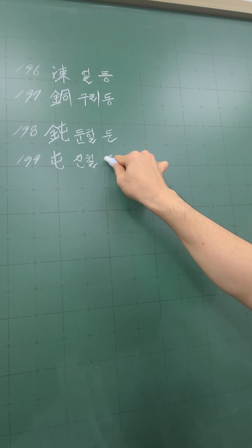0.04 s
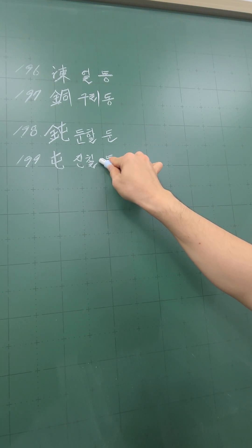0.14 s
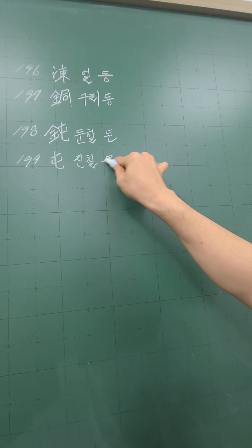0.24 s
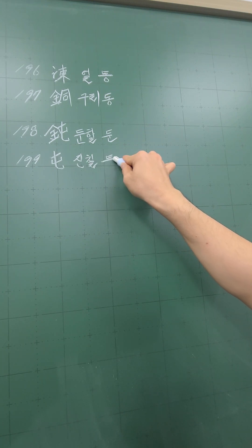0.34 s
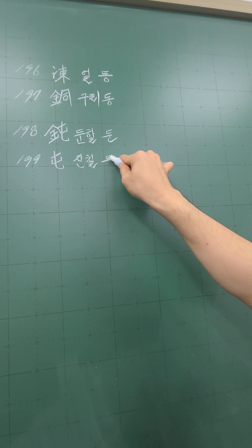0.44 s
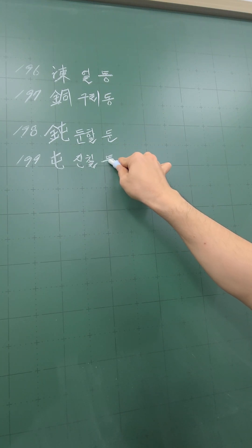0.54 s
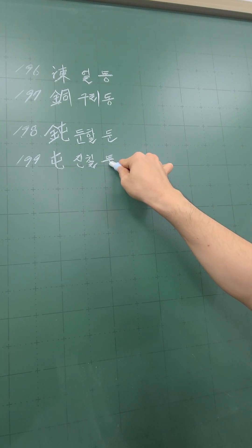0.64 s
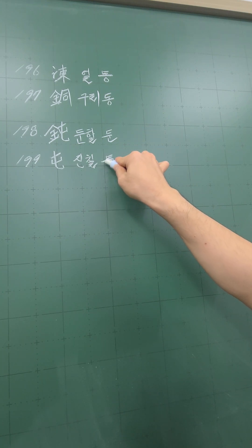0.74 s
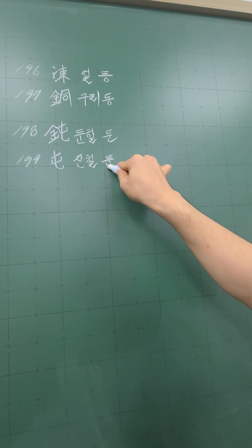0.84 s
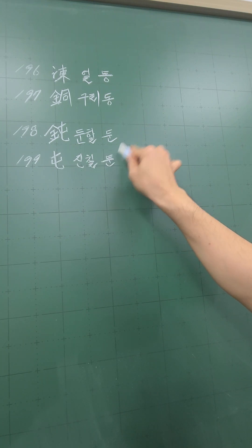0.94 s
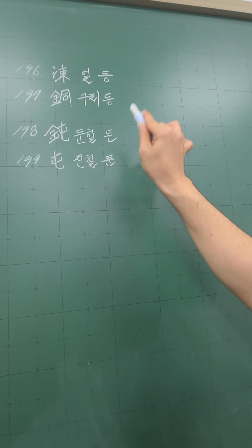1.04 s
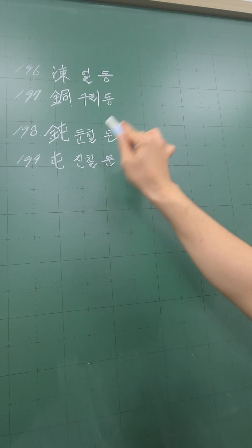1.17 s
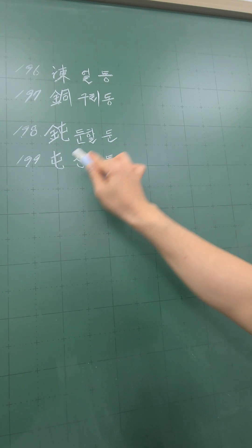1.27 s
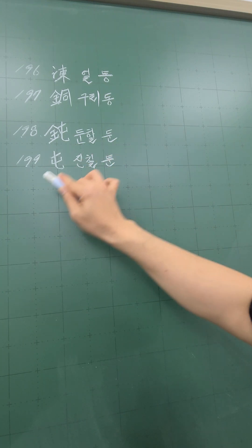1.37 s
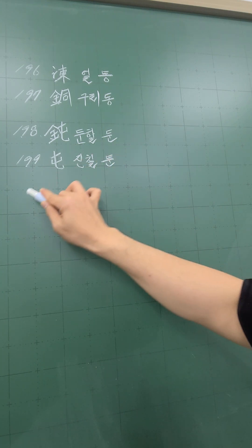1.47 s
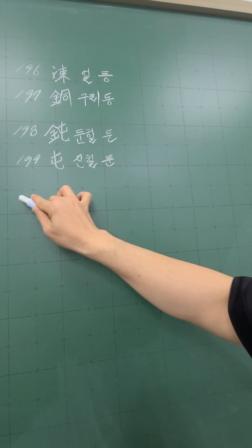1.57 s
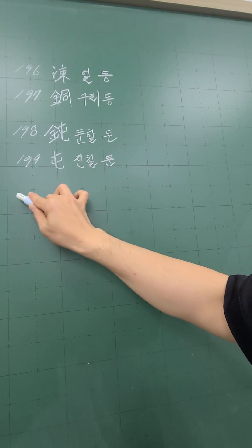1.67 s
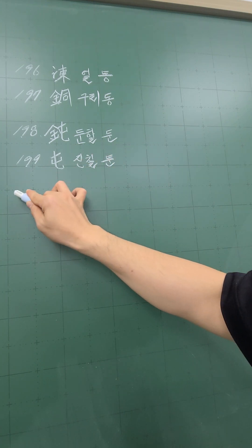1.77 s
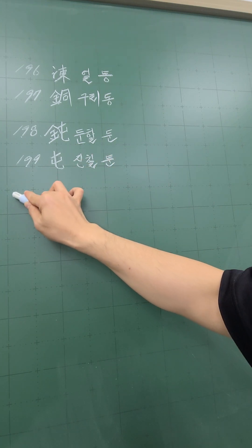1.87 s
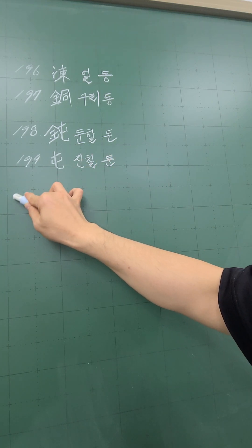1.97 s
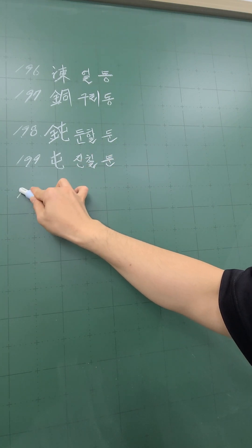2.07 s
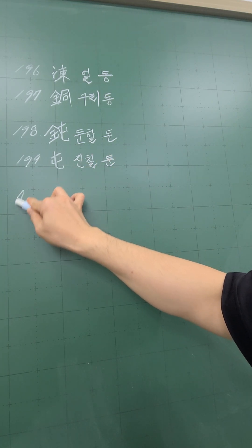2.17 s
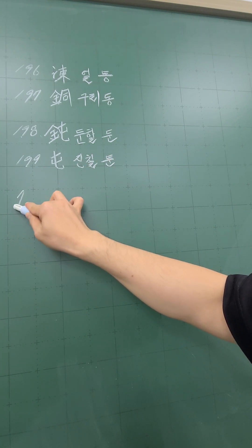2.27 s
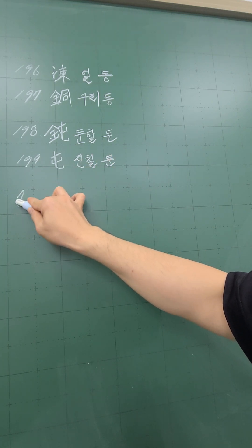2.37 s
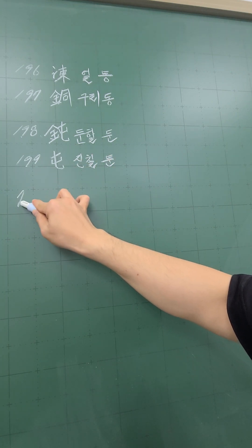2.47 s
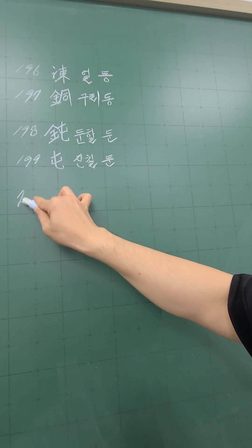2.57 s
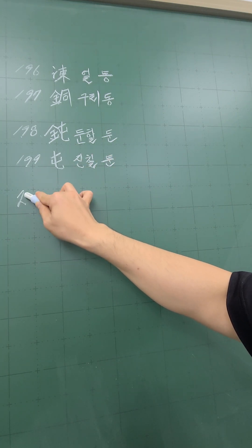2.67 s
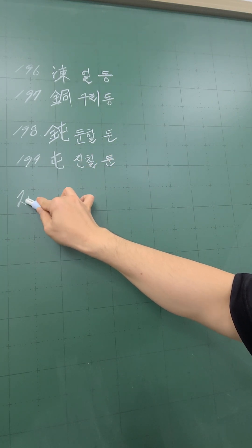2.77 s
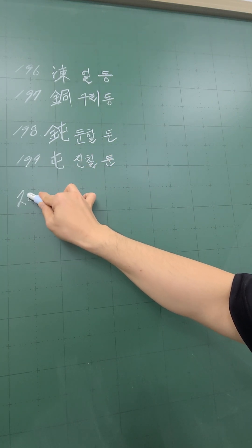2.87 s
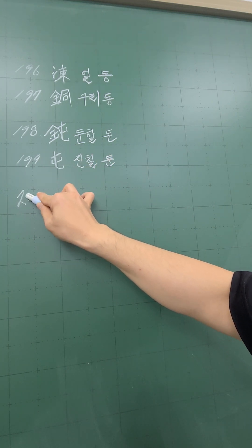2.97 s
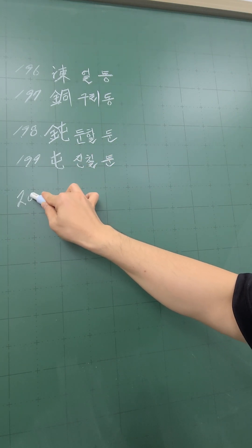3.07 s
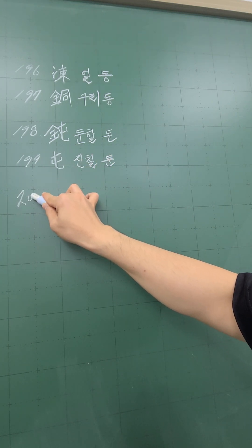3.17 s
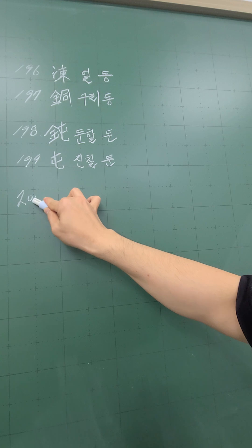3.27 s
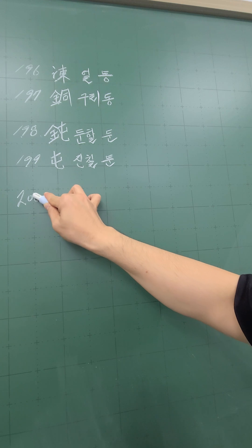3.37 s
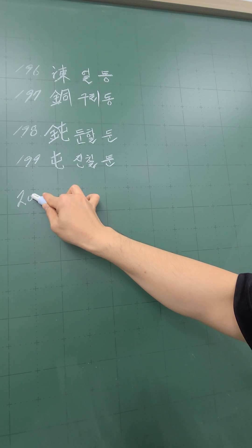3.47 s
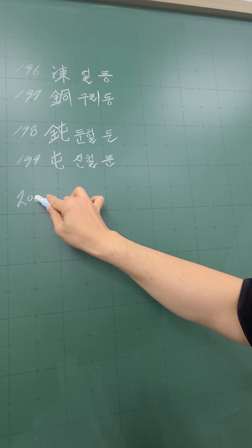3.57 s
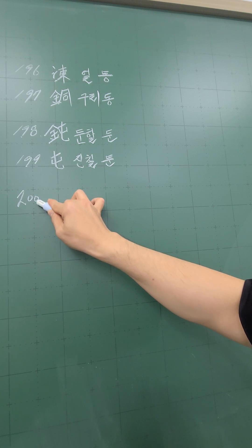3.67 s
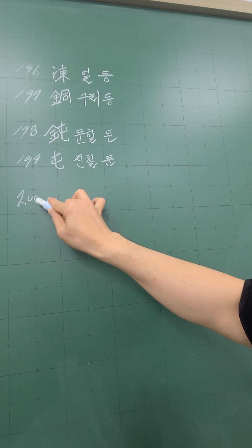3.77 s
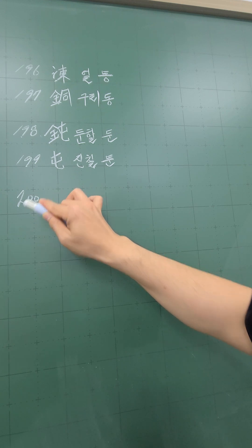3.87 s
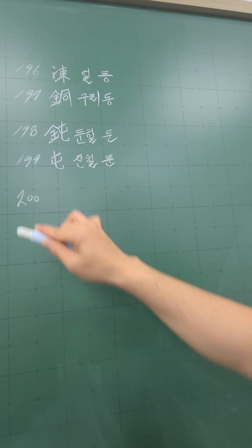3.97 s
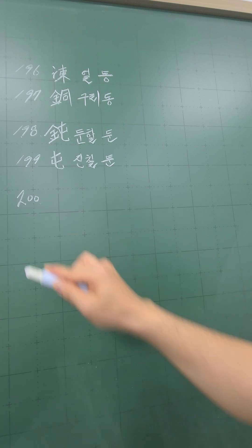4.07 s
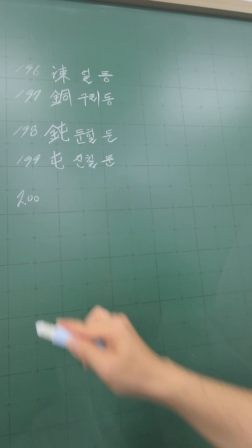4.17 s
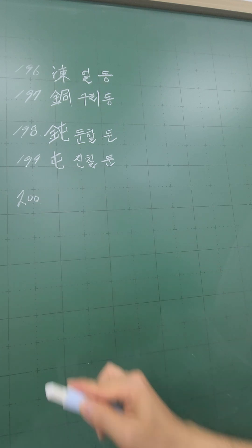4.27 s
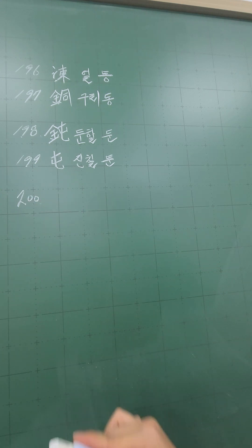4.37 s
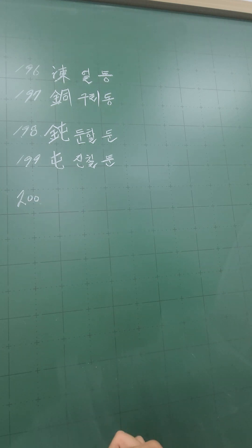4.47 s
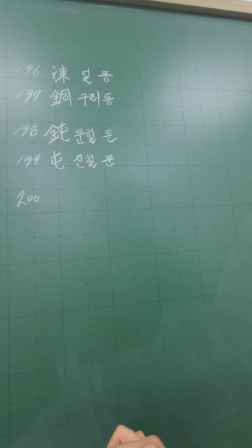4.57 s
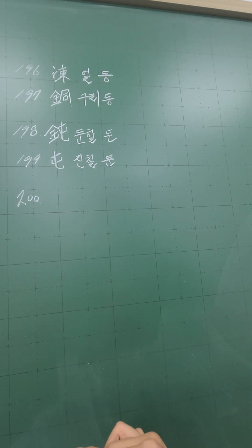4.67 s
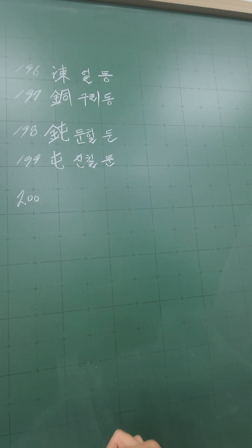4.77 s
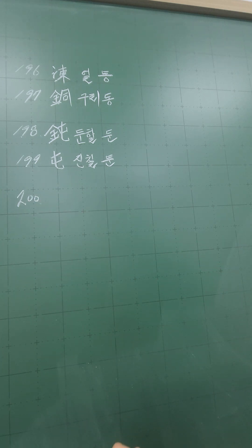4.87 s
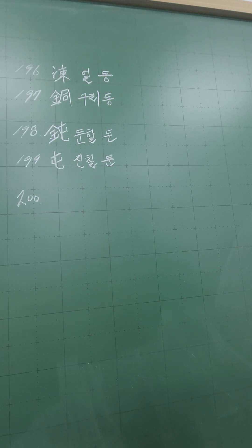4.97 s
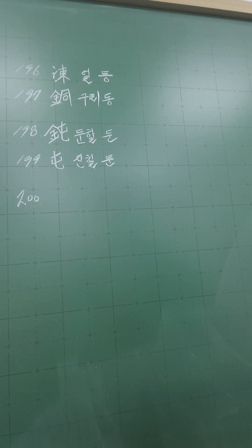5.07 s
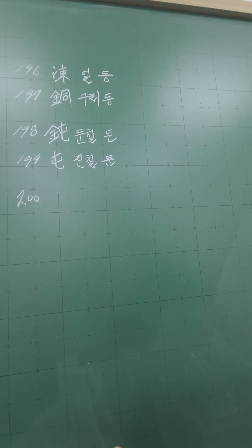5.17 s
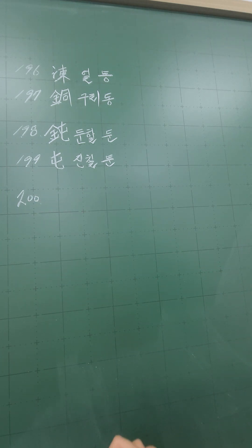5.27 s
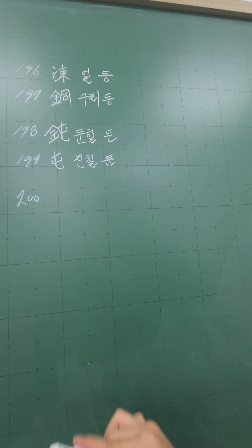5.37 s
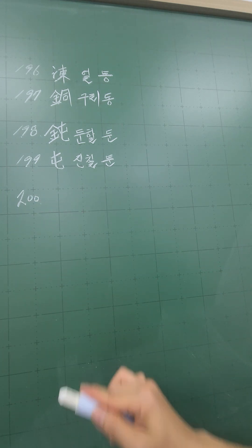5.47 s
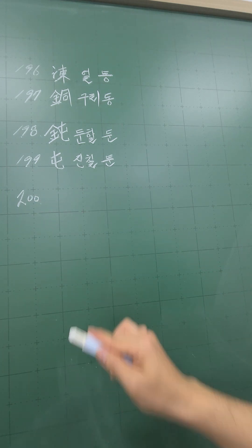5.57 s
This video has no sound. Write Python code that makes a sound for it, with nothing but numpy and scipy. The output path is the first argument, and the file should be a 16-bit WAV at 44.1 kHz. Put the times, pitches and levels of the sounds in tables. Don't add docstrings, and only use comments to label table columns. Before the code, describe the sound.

In a quiet classroom, hard chalk ticks and brief gritty hisses ring a hollow board before only low ventilation and rumble remain.

```python
import sys
import numpy as np
from scipy import signal
from scipy.fft import rfft, irfft, next_fast_len
from scipy.io import wavfile
from scipy.ndimage import uniform_filter1d

SR = 44100
rng = np.random.default_rng(int(sys.argv[2]) if len(sys.argv) > 2 else 0)


def invert_db(x):
    u = np.asarray(x, float) / 20
    return 10 ** u


def wav_record(signal):
    frames = np.transpose(np.atleast_2d(signal))
    bounded = np.clip(frames, -1, 1)
    quanta = np.round(bounded * 32767).astype(np.int16)
    wavfile.write(sys.argv[1], SR, quanta)


N = 248710

# start_s, peak_db, board_thump_db, chalk_snap_db, top_sparkle_db
EARLIER = [
    (-0.14, -38, -3.5, -13, -10),
]
RIGHT_TAPS = [
    (0.273, -22, -6, -9.5, -24.5),
    (0.5912, -16.5, -4.5, -6.5, -17),
    (0.85, -15, -4.5, -9, -18.5),
]
LEFT_TAPS = [
    (2.006, -19, -10, -20, -38.5),
    (2.741, -21, -10, -15, -37),
    (3.2022, -20, -10, -14.5, -34.5),
    (3.7645, -7.5, -11, -11.5, -20),
]
# freq_hz, density_db (per Hz)
RIGHT_TICK = [(59, -60.5), (100, -8), (214, -7.5), (479, -6), (1000, -15.5), (2100, -22), (2700, -10),
              (4140, -8.5), (6000, -22), (8680, -34.5), (11500, -31.5), (15700, -30), (17000, -48)]
LEFT_TICK = [(59, -41.5), (100, -8), (294, -1), (865, -10), (1050, -7.5), (1500, -19), (3100, -8),
             (5010, -14.5), (6320, -15), (8500, -34.5), (11200, -27.5), (15700, -35), (17000, -41)]
# freq_hz, gain_db
EDGE = [(600, -1), (1300, 6), (2200, -1), (5000, 2), (10000, 0.5)]
# freq_hz, level_db, t60_s
RIGHT_BOARD = [(172.2, -7, 0.5), (174.1, -11, 0.56), (270.3, -8, 0.37), (335.7, 0.5, 0.25),
               (451, -10, 0.63), (522, -4, 0.25), (653, -40, 0.65), (665, -13, 0.6), (886, -16, 0.35),
               (976, -18, 0.44)]
LEFT_BOARD = [(99.7, -13, 1), (151.4, -7.5, .55), (268, -4, 0.2), (335, -6, 0.3), (371.7, -6.5, 0.45),
              (462, -4, .3), (520, -8.5, .4), (627, -12, .5), (723, -10, 0.27), (839, -12, 0.55),
              (967, -15, .5), (1186, -19.5, 0.69)]
RIGHT_PAN_DB, LEFT_PAN_DB = -4.5, -2.5
BOUNCE_S, BOUNCE_DB = .00034, -4
FLIGHT_S = .0015


def taps(size=2 ** 16):
    out = np.zeros((2, N + 2 * SR))
    hz = np.fft.rfftfreq(size, 1 / SR)
    places = [(EARLIER + RIGHT_TAPS, RIGHT_TICK, RIGHT_BOARD, RIGHT_PAN_DB),
              (LEFT_TAPS, LEFT_TICK, LEFT_BOARD, LEFT_PAN_DB)]
    skip = 1 + invert_db(BOUNCE_DB) * np.exp(-2j * np.pi * hz * BOUNCE_S)
    edge = causal(on_log(EDGE, hz))
    for landings, colour, modes, pan_db in places:
        direct, early, diffuse = paths(pan_db)
        for start_s, peak_db, thump_db, snap_db, sparkle_db in landings:
            thump = (thump_db + 10.5) / (1 + (hz / 1300) ** 4)
            snap = (snap_db + 10) * np.exp(-((hz - 6000) / 1800) ** 2)
            sparkle = (sparkle_db + 25) / (1 + (8000 / np.maximum(hz, 1)) ** 6)
            tick = -causal(on_log(colour, hz) + thump + snap + sparkle)
            ring = rfft(board(modes, size)) * invert_db(thump_db - 35.0)
            travelled = skip * (edge * direct + early) + invert_db(-25.0) * diffuse
            heard = irfft(tick * travelled - ring)[:, :SR]
            at = int((start_s + FLIGHT_S + 1) * SR)
            out[:, at:at + SR] += invert_db(peak_db + 24) * heard
    return out[:, SR:SR + N]


def board(modes, size):
    t = np.arange(size) / SR
    ring = np.zeros(size)
    shifts = rng.standard_normal((len(modes), 2)) * [1.5, .004]
    for (hz, db, t60_s), (db_shift, hz_shift) in zip(modes, shifts):
        fade = invert_db(db + db_shift - 60 * t / t60_s)
        ring += fade * np.sin(2 * np.pi * hz * (1 + hz_shift) * t)
    return ring


# fastest_s, hiss_db, rise_s, fall_s (per 20 dB), brightness_db
STROKES = [
    (0.0, -80.5, .05, .1, 10),
    (0.335, -64, .09, .125, 13),
    (0.982, -61, .045, 0.07, 17.5),
    (2.095, -66.5, .05, .06, 8),
    (2.259, -60, .075, .085, 11.5),
    (2.43, -76, .1, .08, 9.5),
    (2.53, -73, .1, .13, 14.5),
    (2.81, -66, .06, .055, 12),
    (3.288, -69, .05, .06, 9),
]
# fastest_s, hiss_db, rise_s, fall_s (per 20 dB), brightness_db
LOOPS = [
    (2.93, -70, .07, .13, 13.7),
    (3.425, -69.5, .09, .115, 14.7),
]
# freq_hz, density_db (per Hz)
SCRAPE = [(710, -37.5), (1200, -17.5), (1800, -21), (2380, -6), (3090, -1), (4400, -2.5), (5600, -8),
          (7440, -16.5), (8700, -30.5), (11300, -11.5), (13000, -14), (15700, -17)]
SKID_LATE_S, SKID_DB, SKID_RISE_S, SKID_FALL_S, SKID_BRIGHT_DB = .035, -34.5, .012, 0.12, 3.5
SKID_PER_SPARKLE = .7
DRAG_DB, DRAG_PER_BRIGHT = 1.5, -1.5
LOOP_DRAG_DB = 19
ROUNDNESS = 1.6


def strokes():
    skids = []
    for start_s, peak_db, _, _, sparkle_db in RIGHT_TAPS + LEFT_TAPS:
        skid_db = peak_db + SKID_DB + SKID_PER_SPARKLE * sparkle_db
        skids.append((start_s + SKID_LATE_S, skid_db, SKID_RISE_S, SKID_FALL_S, SKID_BRIGHT_DB))
    fastest_s, hiss_db, rise_s, fall_s, bright_db = np.transpose(STROKES + skids + LOOPS)
    looped = np.arange(len(fastest_s)) >= len(fastest_s) - len(LOOPS)
    shape = [ROUNDNESS] * len(STROKES) + [1] * len(skids) + [ROUNDNESS] * len(LOOPS)
    shape = np.array(shape)[:, None]

    crumb_size = invert_db(np.minimum(3 * rng.exponential(size=N), 12))
    crumbs = rng.standard_normal(N) * crumb_size * (rng.random(N) < .3)
    waver = invert_db(1.4 * walk(120))
    size = next_fast_len(N + 2 ** 16)
    hz = np.fft.rfftfreq(size, 1 / SR)
    grit = rfft(unit(crumbs), size) * invert_db(on_log(SCRAPE, hz))
    high = 1 / (1 + (7500 / np.maximum(hz, 1)) ** 6)
    low = 1 / (1 + (hz / 1900) ** 8)
    hiss, scrape, drag = (unit(irfft(grit * share, size)[:N]) for share in (high, 1 - high - low, low))

    def press(more_db):
        return uniform_filter1d(swells(fastest_s, hiss_db + more_db, rise_s, fall_s, shape), 300)

    drag_db = DRAG_DB + DRAG_PER_BRIGHT * bright_db + LOOP_DRAG_DB * looped
    rubbing = press(0) * hiss + press(15.5 - bright_db) * scrape + press(drag_db) * drag
    direct, early, diffuse = paths(pan_db=-6.5)
    heard = irfft(direct + early + invert_db(-34.5) * diffuse)[:, :SR]
    return irfft(rfft(rubbing * waver, size) * rfft(heard, size), size)[:, :N]


# freq_hz, t60_s
ROOM_T60 = [(100, 0.79), (250, 0.53), (600, 0.73), (1400, 0.52), (2800, 0.55), (5500, 0.46), (8000, 0.41),
            (12000, 0.16)]
# freq_hz, gain_db
ROOM_TONE = [(100, -3), (250, 0), (600, -3), (1000, -0.5), (1500, -0.5), (2800, -2.5), (5500, -3),
             (8000, -2), (12000, -6), (15500, -3.5)]
# freq_hz, likeness (-1 to 1)
ROOM_ALIKE = [(60, 1), (130, 0.78), (290, 0.96), (640, 0), (1400, 0.25), (12000, 0.)]
# delay_s, left_db, right_db
ECHOES = [
    (.0022, -12, -9),
    (.0039, -4, -10),
    (.0048, -10, -5),
    (.0075, -8, -11),
    (.0088, -11, -8),
]
PORT_LAG_S = .0001
ROOM_PAN_DB = -2.5
CLUSTER_DB, CLUSTER_T60_S = 8, .06


def paths(pan_db, size=2 ** 16):
    hz, t = np.fft.rfftfreq(size, 1 / SR), np.arange(size) / SR
    noise, tail = pair(ROOM_ALIKE, size), 0
    octave = np.log2(np.maximum(hz, 1) / 50)
    for k in np.arange(0, 9, .5):
        band = np.cos(np.pi * np.clip(octave - k, -.5, .5)) ** 2
        tail = tail + irfft(noise * band) * invert_db(-60 * t / on_log(ROOM_T60, 50 * 2 ** k))
    tail = tail * (1 - np.exp(-(t / 0.0023) ** 2)) * (t < 1)
    lumps = uniform_filter1d(np.repeat(rng.standard_normal((2, size // 32)), 32, axis=1), 32)
    cluster = tail * invert_db(CLUSTER_DB + 3.1 * lumps - 60 * t / CLUSTER_T60_S)

    def delay(s):
        return np.exp(-2j * np.pi * hz * s)

    def ports(left_db, right_db):
        shadow = hz ** 2 / (hz ** 2 + 2000 ** 2)
        side = np.array([[1], [-1]])
        return invert_db((left_db + right_db) / 2 + shadow * (left_db - right_db) / 2 * side)

    direct = ports(pan_db / 2, -pan_db / 2) * np.array([delay(0), delay(PORT_LAG_S)])
    early = sum(ports(left_db, right_db) * delay(s) for s, left_db, right_db in ECHOES)
    treble = hz ** 2 / (hz ** 2 + 900 ** 2)
    diffuse = ports(ROOM_PAN_DB / 2, -ROOM_PAN_DB / 2) * (rfft(tail) + treble * rfft(cluster))
    tone = causal(on_log(ROOM_TONE, hz))
    return direct, tone * early, tone * diffuse


# peak_s, rumble_db, wobble_db, rise_s, fall_s (per 20 dB)
JOLTS = [(0.04, -61, -55, 0.068, .12), (0.3, -57.5, -54, 0.043, 0.26), (0.5, -62, -57, .15, 0.1),
         (0.68, -43.5, -43, 0.1, 0.1), (0.88, -50, -42.5, 0.083, 0.09), (0.98, -41, -40, 0.11, 0),
         (1.12, -61, -40, 0.15, 0.08), (2.1, -56.5, -55.5, 0.09, 0.18), (2.82, -57, -54, 0.15, 0.23),
         (3.22, -57, -53, .06, 0.33), (3.79, -41, -40, 0.043, 0.13), (3.9, -49, -49.5, .08, 0.09),
         (4.09, -56, -51, 0.079, 0.12)]
# time_s, level_db
RUMBLE = [
    (0, -60),
    (1.3, -54.5),
    (2, -60),
    (3.5, -58),
    (4.4, -58),
    (5, -62),
    (5.64, -60),
]
WOBBLE_REST_DB = -7


def bass():
    peak_s, rumble_db, wobble_db, rise_s, fall_s = np.transpose(JOLTS)
    rest = invert_db(np.interp(np.arange(N) / SR, *np.transpose(RUMBLE)))
    hz = np.fft.rfftfreq(N, 1 / SR)
    alike = [(30, 1.0), (70, 0.99)]  # Hz, likeness of the ports
    rumble = unit(irfft(pair(alike, N) / (1 + ((hz - 42) / 13) ** 4), N))
    wobble_hz = 69 * (1 + 0.03973 * walk(7.5))
    wobble = np.sin(2 * np.pi * np.cumsum(wobble_hz) / SR)
    flutter = unit(irfft(pair(alike, N) / (1 + ((hz - 70) / 14) ** 4), N))
    wobble = unit(wobble + 0.4 * flutter)
    rumble_level = rest + swells(peak_s, rumble_db, rise_s, fall_s, 1.3)
    wobble_level = rest * invert_db(WOBBLE_REST_DB) + swells(peak_s, wobble_db, rise_s, fall_s, 1.3)
    return rumble * rumble_level + wobble * wobble_level


# freq_hz, density_db (per Hz)
HUSH = [(95, 1.5), (125, -8.5), (150, -3), (200, -15.5), (363, -16), (900, -23), (1100, -18.5), (2000, -26),
        (3150, -25), (5600, -31), (7600, -43), (9200, -52), (11200, -33.5), (16000, -33)]
# freq_hz, likeness (-1 to 1)
HUSH_ALIKE = [(60, 0.55), (130, 0.65), (290, 0.086), (640, 0.0038), (12000, 0)]
HUSH_DB = -67.5


def hush():
    colour = on_log([(55, -33.5)] + HUSH, np.fft.rfftfreq(N, 1 / SR))
    return unit(irfft(pair(HUSH_ALIKE, N) * invert_db(colour), N)) * invert_db(HUSH_DB)


def swells(s, db, rise_s, fall_s, power):
    t = np.arange(0, N + 64, 64) / SR
    late = t - s[:, None]
    steps = np.maximum(late / fall_s[:, None], -late / rise_s[:, None]) ** power
    level = invert_db(db[:, None] - 20 * np.minimum(steps, 10))
    return np.interp(np.arange(N) / SR, t, np.sum(level, axis=0))


def walk(rate):
    k = int(SR / rate)
    held = np.repeat(rng.standard_normal(N // k + 1), k)
    return unit(uniform_filter1d(held, k)[:N])


def pair(alike, size):
    c = np.clip(on_log(alike, np.fft.rfftfreq(size, 1 / SR)), -1, 1)
    mid, side = rfft(rng.standard_normal((2, size)))
    return (np.sqrt(1 + c) * mid + np.sqrt(1 - c) * side * np.array([[1], [-1]])) / np.sqrt(2)


def causal(db):
    c = irfft(db * np.log(10) / 20)
    c[1:len(c) // 2] *= 2
    c[len(c) // 2 + 1:] = 0
    return np.exp(rfft(c))


def on_log(points, hz):
    f, v = np.transpose(points)
    return np.interp(np.log(np.maximum(hz, 1)), np.log(f), v)


def unit(x):
    return x / np.sqrt(np.mean(x ** 2))


def scene():
    return taps() + strokes() + bass() + hush()


def top_cut(x):
    return signal.sosfilt(signal.butter(12, 16660, fs=SR, output="sos"), x)


def record(dry):
    low_pass = signal.ellip(8, .2, 70, 15600, fs=SR, output="sos")
    mix = signal.sosfilt(low_pass, dry)
    return top_cut(mix)


dry = scene()
out = record(dry)
wav_record(out)
```